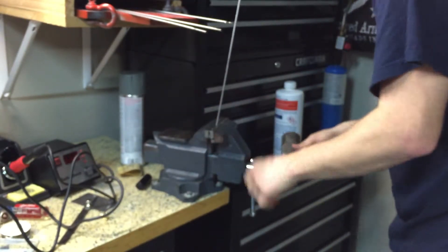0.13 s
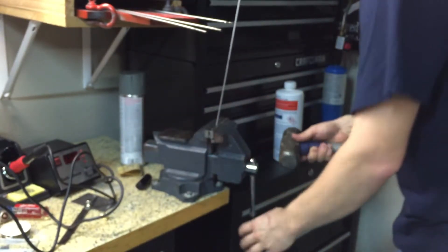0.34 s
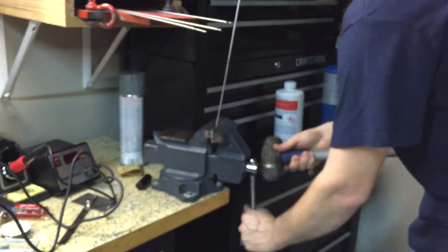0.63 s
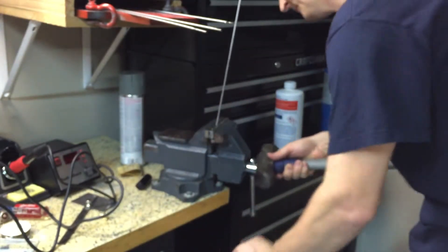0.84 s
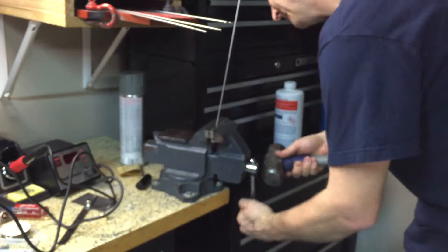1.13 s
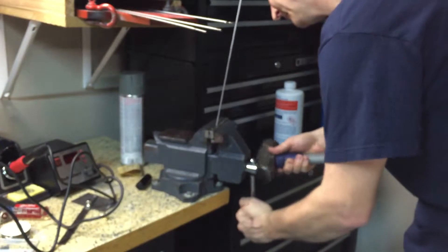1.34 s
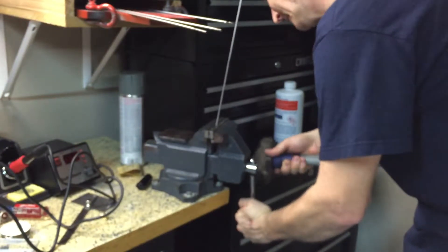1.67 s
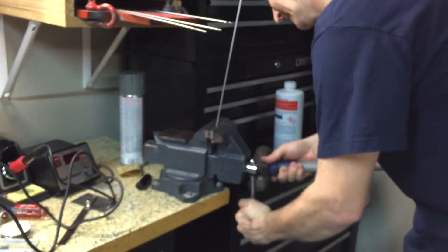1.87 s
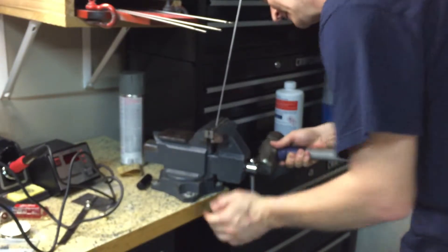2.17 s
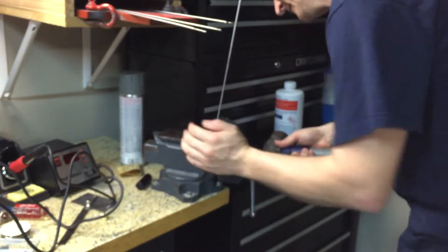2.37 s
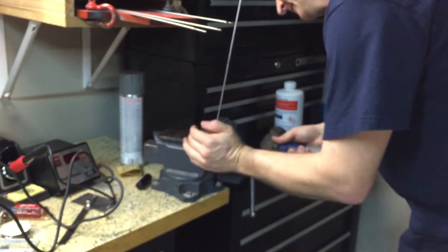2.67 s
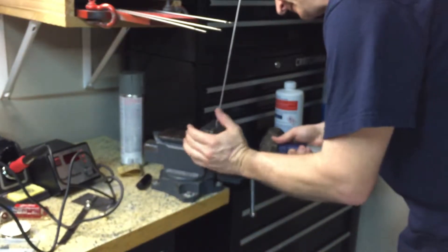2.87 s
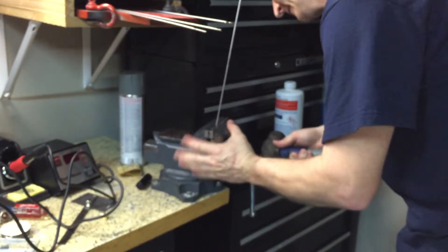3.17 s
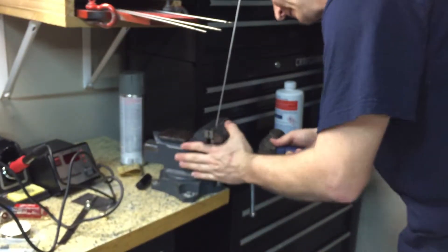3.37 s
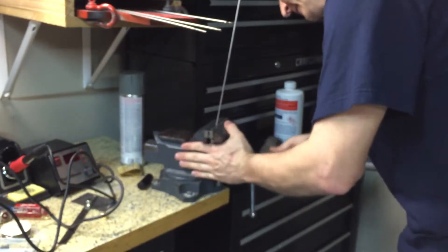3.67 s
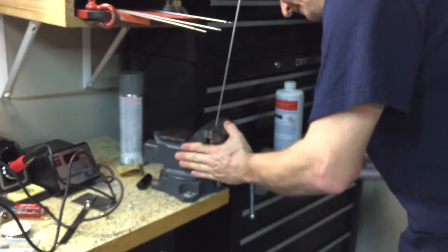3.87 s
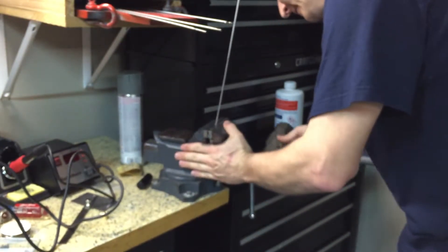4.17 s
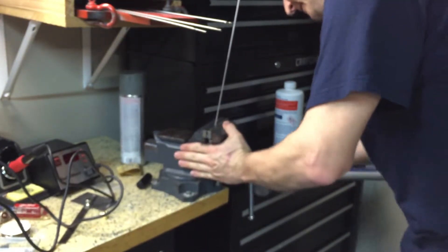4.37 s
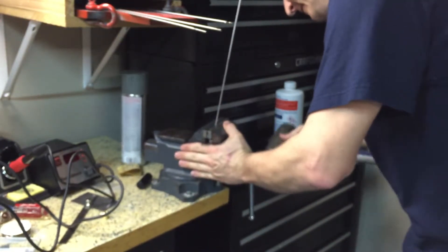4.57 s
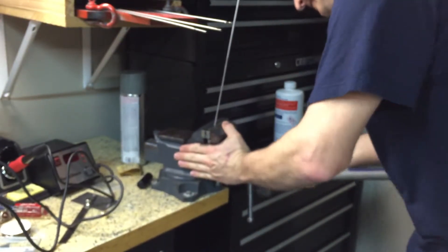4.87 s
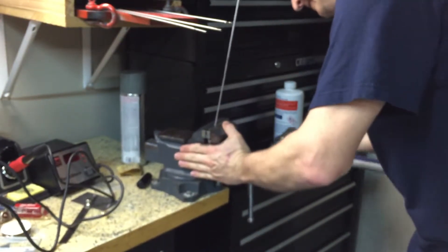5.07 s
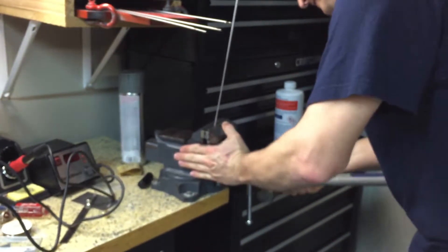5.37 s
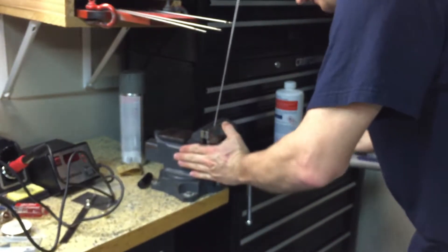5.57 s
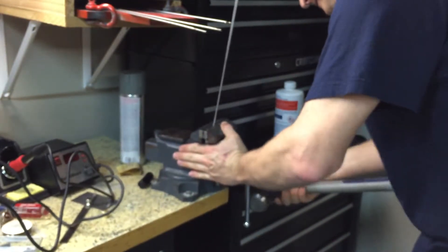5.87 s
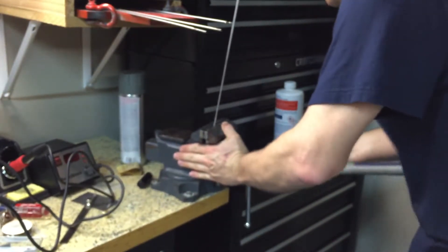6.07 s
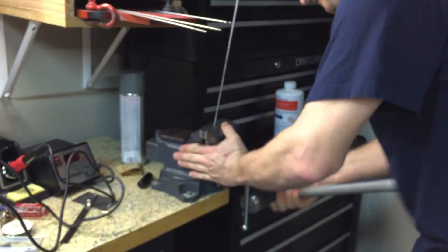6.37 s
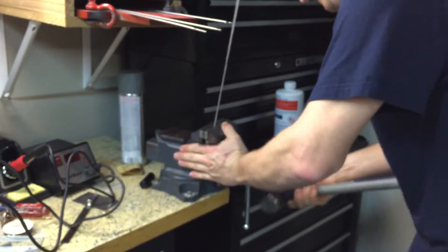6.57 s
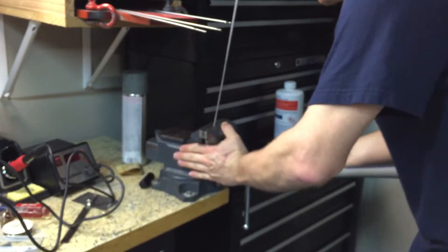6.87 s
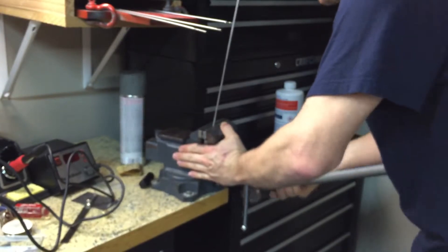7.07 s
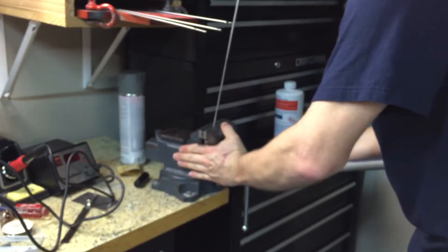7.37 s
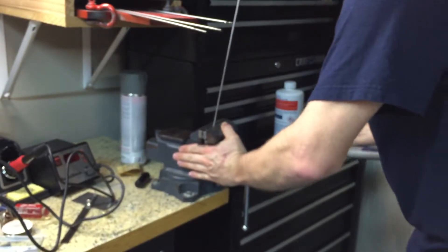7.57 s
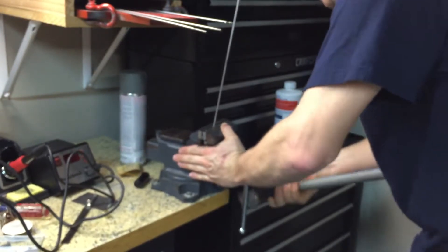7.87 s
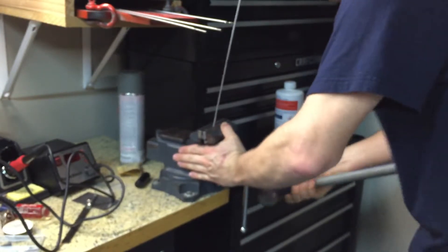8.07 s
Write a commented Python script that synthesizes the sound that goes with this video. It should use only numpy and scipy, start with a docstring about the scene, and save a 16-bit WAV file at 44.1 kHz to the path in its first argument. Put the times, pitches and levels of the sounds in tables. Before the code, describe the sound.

A quiet small workshop with a soft low hum and airy hiss, heard close in one channel. Faint scuffs and a dull touch of metal occur around 0.5-0.7 s and again at 1.2 s. At 1.6 and 1.9 s two heavy hammer blows hit a steel vise: sharp crack, dense midrange clang, bench thump, then rattling and jingling loose parts. Light brushes and a small knock follow near 2.5-2.6 s. From 3.6 s the blows return harder, at about 3.9, 4.3, 4.8, 5.3, 5.8, 6.4, 7.0 and 7.9 s, slowing slightly, their peaks flattened by overload. The clang dies quickly with a short room echo; a clamped rod and thin panel ring faintly longer, while the bench frame drones low. Hollow knocks around 700-800 Hz chatter between blows, strongest from 5.5 to 6.9 s, then sparser, with jingles to the end.

```python
"""Eleven heavy hammer blows on a steel vise crack, clang and ring close to a microphone in a small workshop.
The vise and hammer head ring as fading sine waves, the clang is noise fading band by band, and the wooden
bench thumps. Loose parts rattle, jingle and knock afterwards, made from tiny impacts, noise and short rings.
The bench frame drones on, hands and tools brush metal, and filtered noise makes a low room hum.
The loudest blows overload the recorder, which flattens their peaks."""
import sys
import numpy as np
from scipy import signal
from scipy.fft import rfft, irfft
from scipy.io import wavfile
from scipy.ndimage import uniform_filter1d

SR = 44100
rng = np.random.default_rng(int(sys.argv[2]) if len(sys.argv) > 2 else 0)


def pcm_store(signal):
    """Save signal as 16-bit PCM."""
    levels = np.round(np.clip(np.atleast_2d(signal), -1, 1) * 32767)
    wavfile.write(sys.argv[1], SR, levels.astype(np.int16).T)


N = 362061  # length of the scene in samples

# The hammer blows: t/s, strength/dB, then how hard each part answers, relative to the strength:
# bench/dB, vise base/dB, vise body/dB, jaws/dB, screw/dB, hammer head/dB, clamped rod/dB, bite of the clang/dB,
# treble crack/dB, rattle of loose parts/dB, frame sway/dB, panel drone/dB, thump/dB
BLOWS = [(1.625, -2, -8, -8, -19, -29, -19, -20.5, -48, -19.5, -14.5, -39, -41.5, -34, -10),
         (1.903, -1, -7.5, -9.5, -14.5, -32.5, -23.5, -24.5, -34.5, -18.5, -11.5, -38, -40, -32, -6.5),
         (3.555, 2.5, -16.5, -12.5, -17, -15, -21, -34, -38, -16, -12, -40.5, -42.5, -35.5, -9.5),
         (3.939, 2.5, -17.5, -13.5, -14, -11, -21, -12.5, -38, -16.5, -11, -39, -40.5, -35, -9),
         (4.342, 4, -23, -13, -15.5, -14, -18, -27, -41, -17, -11.5, -40, -44.5, -38, -9),
         (4.783, 2, -24.5, -10.5, -13, -9.5, -13.5, -22, -40, -15.5, -10, -37.5, -45, -39.5, -5.5),
         (5.252, 3.5, -18, -13, -24, -13, -37, -14, -38.5, -16.5, -11, -38.5, -43, -36, -10.5),
         (5.809, 4.5, -17, -10.5, -22, -16, -21, -17, -47.5, -18, -12, -40.5, -41.5, -35.5, -16.5),
         (6.424, 4, -15.5, -29, -24.5, -14, -32, -14.5, -42, -18.5, -11.5, -41.5, -48, -35, -19.5),
         (7.018, 4, -16.5, -26.5, -18, -12.5, -29.5, -4, -38.5, -17, -13.5, -41.5, -44.5, -35.5, -12),
         (7.878, 4, -18.5, -14.5, -22, -14.5, -18, -10, -40, -16.5, -10.5, -43.5, -42, -35, -16.5)]
# Ringing tones (modes) of three parts of the vise: f/Hz, level/dB, time to fade by 60 dB/s
VISE_BASE = [(581, -4, 0.11), (659, 9.5, 0.053), (678.4, -4.5, 0.26), (834, 3, 0.085), (828, -17, 0.18)]
VISE_BODY = [(1003, 0, 0.15), (1053, 10.5, 0.058), (1242, 2, .13), (1304, -1.5, 0.24), (1520, 6, 0.05),
             (1536, -11, 0.15)]
VISE_JAWS = [(1830, -3, 0.073), (1967, -4, 0.12), (2097, -14.5, 0.13), (2492, -4, 0.12), (2713, -6, 0.11),
             (2960, -3.5, 0.038)]
# How slowly a blow swells, bass later than treble: f/Hz, rise time/s
BLOW_RISE = [(100, 0.012), (700, 0.0086), (2500, 0.0041), (6000, 0.00026)]


def amp(db):
    """Turns decibels into a gain."""
    return 10 ** (np.asarray(db) / 20)


def evened(x):
    """Scales a signal to an average strength (rms) of one."""
    return x / np.sqrt(np.mean(abs(x) ** 2) + 1e-20)


def read(points, hz):
    """Reads a table between its points, with frequency on a log scale as in hearing."""
    f, value = np.transpose(points)
    return np.interp(np.log(hz + 1), np.log(f + 1), value)


def add(mix, s, sound):
    """Mixes a sound in at time s, in seconds."""
    part = mix[round(s * SR):][:len(sound)]
    part += sound[:len(part)]


def colour(x, spectrum):
    """Filters a signal by a table of levels over frequency, then scales it to an rms of one."""
    hz = np.fft.rfftfreq(len(x), 1 / SR)
    return evened(irfft(rfft(x) * amp(read(spectrum, hz)), len(x)))


def resonant(peaks):
    """Makes steady noise that is strong only around a few narrow resonances (f/Hz, width/Hz, level/dB)."""
    hz = np.fft.rfftfreq(N, 1 / SR)
    power = sum(amp(db) ** 2 / (1 + (2 * (hz - f) / width) ** 2) ** 2 for f, width, db in peaks)
    return evened(irfft(rfft(rng.standard_normal(N)) * np.sqrt(power), N))


def envelope(starts, levels_db, swells, holds, fades):
    """Adds up the power of events that swell (s), hold (s) and fade (dB per s)."""
    power, t = np.zeros(N), np.arange(2 * SR) / SR
    for s, db, swell, hold, fade in np.broadcast(starts, levels_db, swells, holds, fades):
        fading = amp(db - fade * np.maximum(t - hold, 0))
        add(power, s, ((1 - np.exp(-t / swell)) * fading) ** 2)
    return np.sqrt(power)


def after(column, shape):
    """How strongly one part keeps sounding after the blows; shape is (swell s, hold s, fade dB per s)."""
    rows = np.array(BLOWS)
    return envelope(rows[:, 0], rows[:, 1] + rows[:, column], *shape)


def hum():
    """Room tone: low noise that drifts in level plus airy noise, both mottled in patches of time and pitch."""
    # Spectrum of the low hum: f/Hz, relative level per Hz/dB
    low_spectrum = [(12, -52.5), (20, -20), (54, -22.5), (154, -6), (217, -4), (354, -12.5), (455, -31),
                    (498, -20), (1500, -25), (1950, -40.5), (3300, -120)]
    # Spectrum of the airy hiss: f/Hz, relative level per Hz/dB
    airy_spectrum = [(600, -18), (1000, -3.5), (1500, -8.5), (2100, -8.5), (3700, -10.5), (4700, -22),
                     (6000, -24), (7000, -25.5), (8500, -29.5), (15000, -33.5)]
    low_db, airy_db, drift_db, patch_db = -52, -62.5, 0.79, 2.2
    a, b, c = rng.standard_normal((N, 3)).T
    drift = evened(uniform_filter1d(uniform_filter1d(c, 4000), 4000))
    low = amp(low_db + drift_db * drift) * colour(a, low_spectrum)
    airy = amp(airy_db) * colour(b, airy_spectrum)
    z = signal.stft(low + airy, nperseg=512)[2]
    # Random gains smoothed over time (axis 0) and frequency (axis 1)
    patches = uniform_filter1d(rng.standard_normal(z.T.shape), size=12, axis=0)
    patches = evened(uniform_filter1d(patches, size=3, axis=1))
    return signal.istft(z * amp(patch_db * patches.T), nperseg=512)[1][:N]


def drone():
    """The bench frame and its panels keep humming in their low resonances."""
    # Resonances of the swaying frame: f/Hz, width/Hz, level/dB
    frame_peaks = [(70, 20, -13), (83, 9.7, 6.5), (112, 42, 6.5)]
    # Resonances of the panels: f/Hz, width/Hz, level/dB
    panel_peaks = [(211.7, 4, 8), (229, 44, -2.5), (286, 70, -3.5), (381, 58, -8.5)]
    # The frame sways again, as if leaned on: t/s, level/dB, length/s
    lurches = [(2.55, -51, 0.17), (3.325, -51.5, 0.033), (6.1, -44, .12), (7.247, -39, 0.052),
               (7.555, -41.5, 0.13), (8.074, -39, 0.054)]
    s, db, length = np.transpose(lurches)
    sway = after(column=12, shape=(.12, 0.27, 24))
    panel = after(column=13, shape=(0.071, 0.18, 32))
    leaning = envelope(s, db, swells=0.022, holds=length, fades=150.5)
    sway = np.hypot(sway, leaning)
    return sway * resonant(frame_peaks) + panel * resonant(panel_peaks)


def touches():
    """Hands and tools brush metal: a scuff of noise around one pitch over a dull bump that rings longer."""
    # The touches: t/s, level/dB, scuff centre f/Hz, scuff 60 dB fade time/s, rise time/s, bump relative level/dB
    brushes = [(0.456, -55, 5000, 0.028, .001, -20), (.52, -62, 7000, 0.073, .006, -20),
               (0.652, -48.5, 1590, 0.13, .004, -11), (0.677, -40, 2380, 0.12, 0.0018, 2),
               (1.201, -48, 5900, 0.11, 0.0015, -6), (2.642, -47, 2090, 0.14, 0.0025, -12.5),
               (2.644, -43, 1160, 0.24, .001, -19), (1.203, -47, 2500, 0.068, 0.00091, -15)]
    out, t = np.zeros(N), np.arange(12000) / SR
    for s, db, hz, t60, rise, bump_db in brushes:
        a, b = rng.standard_normal((len(t), 2)).T
        scuff = colour(a, [(hz / 6, -14), (hz / 1.3, -11), (hz, 0), (hz * 1.25, -12),
                           (hz * 1.7, -20), (hz * 3, -26), (hz * 5, -45)])
        bump = colour(b, [(200, -38), (390, 7), (480, -10.5), (1200, -16.0), (3000, -48)])
        sound = scuff * amp(-60 * t / t60) + bump * amp(bump_db - 60 * t / 0.41)
        add(out, s, amp(db) * (1 - np.exp(-t / rise)) * sound)
    return out


def shake():
    """Loose parts make dense tiny impacts, smeared by the room; they also keep the vise's modes alive."""
    # Spectrum of the rattle: f/Hz, relative level per Hz/dB
    rattle_spectrum = [(210, -21), (350, 1.5), (437, -5), (517, 4), (638, -5.5), (824, -1.5), (1240, -2.5),
                       (1780, -11), (2320, -15.5), (5000, -32.5), (6500, -53.5), (11000, -120)]
    # Spectrum of the jingling small metal: f/Hz, relative level per Hz/dB
    jingle_spectrum = [(2060, -6), (3500, -6), (4970, -11), (9090, -12), (13700, -21), (15600, -17.5),
                       (16000, -45.5)]
    # Short bursts of jingling: t/s, level/dB, length/s
    jingles = [(1.792, -77, 0.019), (1.864, -47, 0.022), (2.013, -44, 0.034), (2.161, -53, 0.03),
               (2.233, -51, 0.033), (2.445, -65.5, 0.021), (3.751, -48, 0.023), (3.775, -45.5, 0.046),
               (3.897, -46.5, 0.036), (4.1194, -45.5, 0.043), (4.16, -47.5, 0.06), (4.244, -46.5, 0.079),
               (4.542, -42, 0.037), (4.59, -42, 0.024), (4.642, -45.5, 0.049), (4.71, -45, 0.071),
               (4.973, -43, 0.048), (5.035, -46.5, 0.055), (5.118, -47, 0.051), (5.185, -44.5, 0.074),
               (5.468, -47, 0.069), (5.587, -45, 0.057), (5.673, -46, 0.035), (5.757, -42.5, 0.023),
               (6.02, -51, 0.034), (6.065, -44, 0.045), (6.128, -46, 0.057), (6.362, -54.5, 0.09),
               (6.582, -63, 0.027), (6.685, -47.5, 0.03), (6.74, -50, 0.04), (6.826, -50, 0.061),
               (6.976, -50.5, 0.05), (7.215, -49, 0.024), (7.245, -45.5, 0.026), (7.283, -45, 0.03),
               (7.341, -46, 0.024), (7.378, -49, 0.03), (7.513, -58, 0.022), (7.544, -52.5, 0.019),
               (7.782, -54.5, 0.023), (7.8311, -48, 0.04), (8.096, -48, 0.026), (8.15, -50.5, 0.03)]
    s, db, length = np.transpose(jingles)
    bursts = envelope(s, db, swells=0.01, holds=length, fades=345)
    jolt_db, bed_db = 3, -17.5  # each burst also stirs the rattle; a faint jingle lies under the bursts
    rattle = np.hypot(after(column=11, shape=(.06, 0.3, 33.3)), amp(jolt_db) * bursts)
    jingle = np.hypot(amp(bed_db) * after(column=11, shape=(.06, .25, 150)), bursts)

    impacts_per_s, smear_s = 150, 0.012
    strengths = amp(1.1 * np.minimum(rng.exponential(1, N), 3))
    impacts = strengths * (rng.random(N) < impacts_per_s / SR)
    smeared_power = signal.lfilter([1], [1, -np.exp(-1 / (smear_s * SR))], impacts ** 2)
    lumps = evened(np.sqrt(smeared_power) + 2.4)  # the added constant keeps some noise between impacts
    a, b = rng.standard_normal((N, 2)).T * lumps
    vise_peaks = [(hz, 16, db + read(rattle_spectrum, hz)) for hz, db, _ in VISE_BASE + VISE_BODY + VISE_JAWS]
    vise = lumps * resonant(vise_peaks)
    return rattle * (colour(a, rattle_spectrum) + amp(-9.0) * vise) + jingle * colour(b, jingle_spectrum)


def knocks():
    """Loose parts knock: a short hollow ring of several sines with a tick of noise on top."""
    # The knocks: t/s, level/dB, pitch f/Hz, relative treble level before a fixed trim/dB
    hits = [(2.474, -38.5, 1110, -10.5), (4.167, -35, 510, -5), (4.545, -43, 762, 4),
            (4.666, -33, 397, -13), (4.945, -26, 800, -33), (5.501, -22.5, 707, -34),
            (5.596, -16.5, 767, -28), (5.65, -30, 830, -9), (5.742, -23.5, 750, -25),
            (6.082, -23.5, 803, -39), (6.123, -31.5, 380, -26), (6.174, -26, 894, -30),
            (6.243, -19.5, 680, -19), (6.315, -24, 764, -42), (6.667, -26, 798, -11),
            (6.782, -20, 750, -22), (6.886, -15.5, 790, -18.5), (6.968, -31.5, 770, -31),
            (7.23, -41, 510, -17), (7.295, -38.5, 1050, -10), (7.387, -38, 1015, -2), (7.802, -51, 1025, 2)]
    # Tones of a knock: multiple of its pitch, level/dB, time to fade by 60 dB/s
    knock_modes = [(1.0001, 2, 0.067), (.76, -4, 0.046), (.88, 6.5, 0.03), (1.14, 1.5, 0.037),
                   (1.58, -7.5, 0.055), (2.0001, -18, 0.055)]
    treble_trim_db = -3.5
    out, t = np.zeros(N), np.arange(6000) / SR
    for s, db, hz, treble_db in hits:
        body = sum(amp(d - 60 * t / t60) * np.sin(2 * np.pi * k * hz * t) for k, d, t60 in knock_modes)
        body = body * (1 - np.exp(-t / 0.0029))
        tick = colour(rng.standard_normal(len(t)), [(900, 0.5), (2000, 5.5), (8000, -26), (14000, -60)])
        tick = tick * amp(treble_db + treble_trim_db - 60 * t / 0.17)
        add(out, s, amp(db) * (body + tick))
    return out


def ring(modes, t, spread_db, detune, rough):
    """Dying sines; each blow lands elsewhere, so levels and pitches scatter, and loose joints add flutter."""
    hz, db, t60 = np.transpose(modes)[:, :, None]
    level, pitch, phase = rng.standard_normal((len(modes), 3)).T[:, :, None]
    # Complex random points, 70 per second, vary both strength and phase
    knots = rng.standard_normal((len(modes), 200, 2)) @ [1, 1j]
    flutter = 1 + rough * np.array([np.interp(t * 70, np.arange(200), k) for k in knots])
    swell = 1 - np.exp(-t / read(BLOW_RISE, hz))
    tone = (flutter * np.exp(2j * np.pi * hz * (1 + detune * pitch) * t + 2j * phase)).imag
    fade = amp(db + spread_db * level - 60 * t / t60)
    return (fade * swell * tone).sum(0)


def clang(t, bite_db, treble_db):
    """Dense modes as noise in octave bands: each rises at its own speed, drops fast, then dies with the room."""
    # Spectra of the full clang, its bite and its sizzling treble: f/Hz, relative level per Hz/dB
    full_spectrum = [(15, -55.5), (25, -44.5), (70, -15.5), (120, -11), (190, -5), (450, -8), (680, -6),
                     (1040, -2), (1650, -9), (2480, -11.5), (3300, -20.5), (4000, -90.5)]
    bite_spectrum = [(1500, -48), (2300, -10.5), (3000, -4.5), (4000, -5), (5200, -3), (6500, -21.5),
                     (8000, -71.5)]
    sizzle_spectrum = [(3500, -64), (5000, -14.5), (6000, 0), (9000, -0.5), (12000, -1), (15000, 0),
                       (16000, -18)]
    # Fading of the direct clang: f/Hz, time to fade by 60 dB/s
    direct_decay = [(100, 0.067), (600, 0.072), (2000, 0.064), (5000, 0.096), (14000, 0.052)]
    # Fading of the room's echo: f/Hz, time to fade by 60 dB/s
    room_decay = [(100, 0.6), (600, 0.38), (2000, 0.34), (5000, 0.36), (14000, 0.25)]
    # Share of the room's echo in a blow: f/Hz, level/dB
    room_share = [(100, -6), (1000, -9), (4000, -11.5), (14000, -18)]
    a, b, c = rng.standard_normal((len(t), 3)).T
    full = amp(-5.0) * colour(a, full_spectrum)
    bite = amp(bite_db) * colour(b, bite_spectrum)
    sizzle = amp(treble_db) * colour(c, sizzle_spectrum)
    noise = rfft(full + bite + sizzle)
    hz, out = np.fft.rfftfreq(len(t), 1 / SR), 0
    for k in np.arange(5, 15):
        mid_hz = 2. ** k
        share = np.cos(np.pi / 2 * np.clip(np.log2(hz + 1) - k, -1, 1)) ** 2  # overlapping bands
        direct = amp(-60 * t / read(direct_decay, mid_hz))
        room = amp(read(room_share, mid_hz) - 60 * t / read(room_decay, mid_hz))
        swell = 1 - np.exp(-t / read(BLOW_RISE, mid_hz))
        out = out + irfft(noise * share, len(t)) * swell * np.hypot(direct, room)
    return out


def blows():
    """Each blow starts with the crack of steel on steel, along with the swelling clang and ringing parts."""
    # Spectrum of the first steel-on-steel contact: f/Hz, relative level per Hz/dB
    crack_spectrum = [(1500, -20.5), (3500, 0), (8000, -2), (15000, -6.5)]
    # Modes of the bench, screw, hammer head and clamped rod: f/Hz, level/dB, time to fade by 60 dB/s
    bench = [(84.5, -25.5, 0.23), (229.7, -7.5, 0.27), (284.6, -9.5, 0.14), (382.5, -0.5, 0.079),
             (529, -26.5, 0.067)]
    screw = [(3920, -6, .08), (4400, -4, .05), (4474, -6, .12), (4620, -8, .06)]
    hammer = [(5330, 0, .045), (5385, -15, .13), (7550, -20, .08), (9900, -10, .04), (12150, -17, .1)]
    rod = [(2280, -17, 0.72), (2360, -4.5, 1.4)]
    # A large thin panel near the bench rings longest: f/Hz, level/dB, time to fade by 60 dB/s
    panel = [(212.4, -31.5, 4.1), (710, -27, 1.3)]
    # The bench top bounces on its legs: f/Hz, level/dB, time to fade by 60 dB/s
    thump = [(124.4, -2.5, 0.15), (128, 0, 0.12)]
    out, t = np.zeros(N), np.arange(72000) / SR
    short = t[:30000]
    rod_swell = 1 - np.exp(-(t / 0.26) ** 2)  # the long rod takes up the blow slowly
    parts = (bench, VISE_BASE, VISE_BODY, VISE_JAWS, screw, hammer)
    for s, db, bench_db, *parts_db, rod_db, bite_db, crack_db, _, _, _, thump_db in BLOWS:
        crack = colour(rng.standard_normal(2000), crack_spectrum) * amp(-60 * t[:2000] / 0.014)
        add(out, s, amp(db + crack_db + 3.0) * crack)

        sound = clang(short, bite_db, crack_db)
        for modes, part_db in zip(parts, (bench_db, *parts_db)):
            sound += amp(part_db) * ring(modes, short, spread_db=3.0, detune=0.0032, rough=0.6)
        sound += amp(thump_db) * ring(thump, short, spread_db=1.0, detune=.01, rough=0.1583)
        add(out, s, amp(db) * sound)

        rod_ring = rod_swell * ring(rod, t, spread_db=1.5, detune=.002, rough=1.1)
        add(out, s, amp(db + rod_db) * rod_ring)
        panel_ring = ring(panel, t, spread_db=1.5, detune=.004, rough=0.16)
        add(out, s, amp(db + bench_db) * panel_ring)  # the panel follows the bench's level
    return out


def scene():
    """Adds all sources in one channel."""
    return (hum() + drone() + touches() + shake() + knocks() + blows())[None]


def record(dry):
    """The recorder's input flattens the highest peaks; then a filter removes the top of the treble."""
    ceiling, knee, edge_hz = .68, 6.0, 15500  # a higher knee bends more sharply
    held = dry / (1 + abs(dry / ceiling) ** knee) ** (1 / knee)
    low_pass = signal.firwin(255, edge_hz, window=("kaiser", 9), fs=SR)
    return signal.oaconvolve(held, low_pass[None], "same")


dry = scene()
out = record(dry)
pcm_store(out)
```